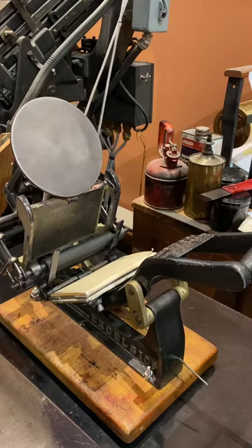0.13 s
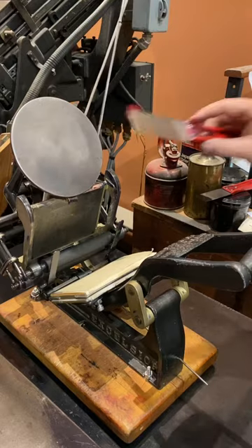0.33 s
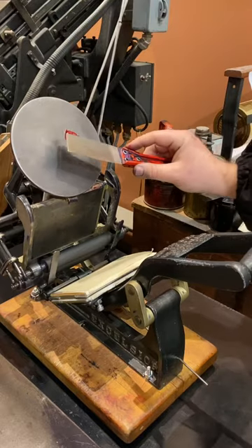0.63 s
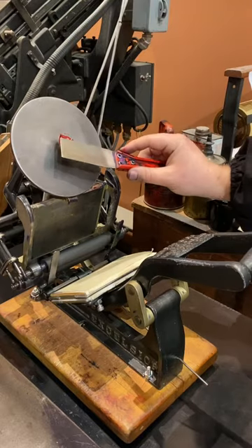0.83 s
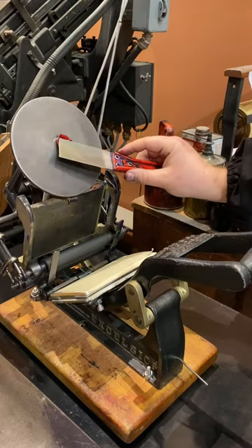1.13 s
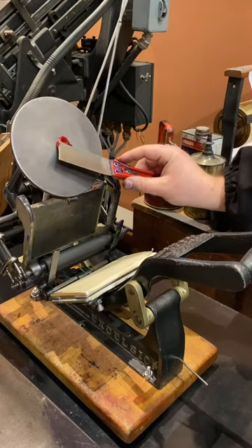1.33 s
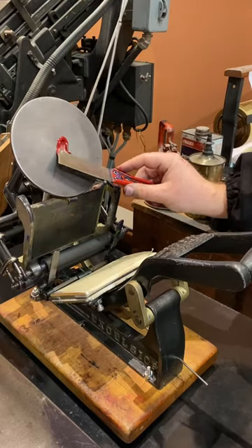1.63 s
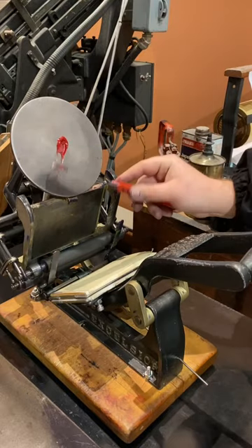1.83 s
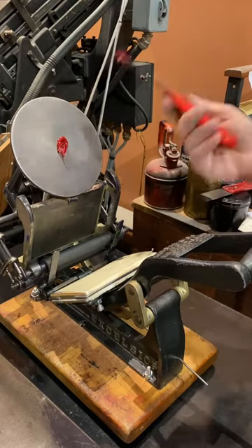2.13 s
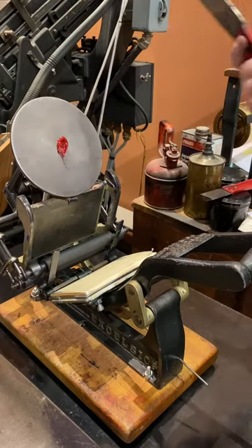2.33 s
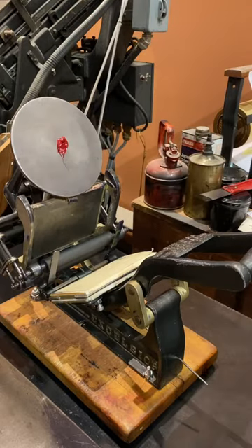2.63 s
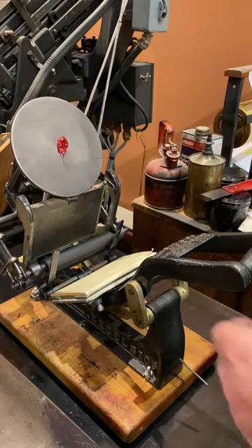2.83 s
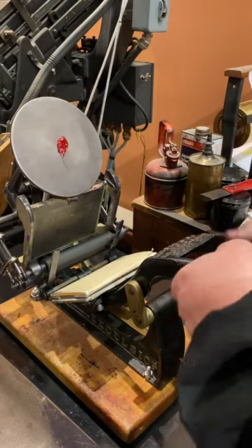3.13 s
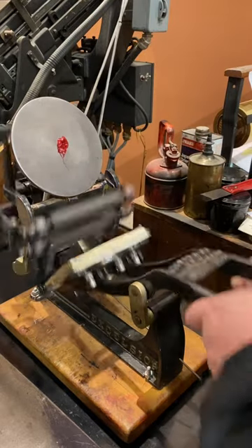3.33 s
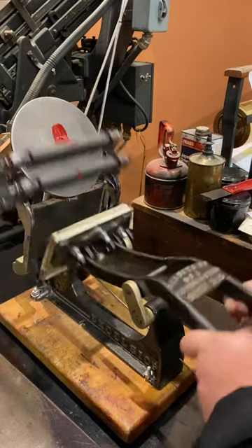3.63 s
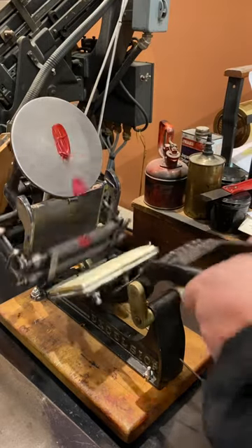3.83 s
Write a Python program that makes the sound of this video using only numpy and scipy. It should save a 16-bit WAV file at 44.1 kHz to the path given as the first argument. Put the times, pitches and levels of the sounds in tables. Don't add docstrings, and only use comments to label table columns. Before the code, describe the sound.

Cast-iron printing press at arm's length: quiet room air, soft knife touches and sleeve rustle first, then a sudden burst of roller grinding, metal clacks, brief disc ringing and heavy double slams in a small room.

```python
import sys
import numpy as np
from scipy import signal
from scipy.fft import rfft, irfft
from scipy.io import wavfile
from scipy.ndimage import uniform_filter1d

SR = 44100
rng = np.random.default_rng(int(sys.argv[2]) if len(sys.argv) > 2 else 0)


def persist_wave(psi):
    counts = np.round(np.clip(psi, -1, 1) * 32767).astype(np.int16)
    wavfile.write(sys.argv[1], SR, np.atleast_2d(counts).T)


def rack_gain(trim_db):
    fader = np.asarray(trim_db, float)
    return 10 ** (fader / 20)


N = 176400

# f/Hz, level/dB [per Hz]
AIR_SPECTRUM = [(35, -32), (60, -7.5), (140, -2.5), (312, -9), (760, -14.5), (1800, -23), (3400, -34),
                (15500, -42)]
# start t/s, air level/dB, offset jump level/dB
TAKES = [
    (0.041, 2, -25.5),
    (.992, 3.5, -25),
    (2.079, 1.3, -24),
    (2.573, 1.6, -23),
]
# t/s, half width/s
DIPS = [
    (2.081, 0.0065),
    (2.571, 0.0082),
]
# t/s, level/dB
HAND_LEVEL = [(.05, -41), (.5, -47), (.55, -37), (.97, -50), (1.02, -36), (1.3, -29.5), (1.6, -31.5),
              (2.06, -30), (2.12, -41), (2.5, -43), (3.08, -45.5), (3.13, -29), (3.5, -27.5), (3.69, -26),
              (3.77, -39.5), (3.9, -33.5), (4, -18)]
# t/s, rub level/dB, hiss level/dB
SLEEVE = [
    (2.57, -46, -60),
    (2.585, -50, -63.5),
    (2.72, -49, -60.5),
    (2.83, -45.5, -68),
    (2.95, -50, -66),
    (3.05, -54.5, -80),
    (3.2, -45, -70.5),
    (3.3, -38.5, -80),
]
# f/Hz, level/dB [per Hz]
CLOTH_SPECTRUM = [(150, -15), (300, -4), (734, -4.5), (1930, -9.5), (2400, -15), (5000, -27.5),
                  (15000, -38)]
# f/Hz, level/dB [per Hz]
HISS_SPECTRUM = [(3000, -36), (5500, -7), (8000, -4), (10500, -10.5), (15000, -20)]
# t/s, level/dB
BENCH_LEVEL = [(3.1, -43.5), (3.405, -40), (3.42, -21), (3.52, -20.5), (3.55, -35.5), (3.66, -52),
               (3.72, -36.5), (3.9, -45.5), (3.915, -28), (4, -23)]
# f/Hz, level/dB, width/Hz
BENCH_MODES = [(91.2, 2.5, 37.6), (109.2, -14, 22), (244.6, -10, 81), (407, -10, 75)]
# t/s, level/dB, f/Hz, decay time T60/s
KNIFE_TAPS = [
    (.54, -44, 895, 0.13),
    (0.546, -57, 2700, 0.065),
    (.565, -50, 1436, 0.057),
    (1.715, -35.5, 398, 0.08),
    (1.988, -43, 2700, 0.017),
    (1.989, -56, 4370, 0.017),
    (0.544, -42, 450, 0.13),
]
# t/s, length/s, level/dB, f/Hz
SQUEAKS = [
    (0.14, .11, -61, 1960),
    (0.27, .12, -63, 1700),
    (.7, .14, -64, 2963),
    (0.092, .45, -61, 750),
    (2.72, .2, -57, 1950),
    (1.04, .14, -62, 1730),
]
# t/s, level/dB, brightness/dB [per octave]
ROLL = [(3.1, -93, -19), (3.26, -37.5, -31), (3.32, -28, -2), (3.355, -15.5, -0.5), (3.42, -15, 0.5),
        (3.48, -17.5, -5), (3.55, -31, -23), (3.63, -41.5, -1), (3.72, -44.5, 1), (3.76, -27, -9.5),
        (3.85, -19, -3), (3.895, -26, -1), (3.92, -33, -11), (4, -19, -14)]
# f/Hz, level/dB, width/Hz
FRAME_MODES = [(613, -13, 230), (966, -5.5, 164), (1162, -0.5, 150), (1578, -1.5, 380), (2070, -1, 760),
               (2860, -3.5, 155), (3470, -5, 1560), (4400, -5, 670), (5440, -14, 67), (6940, -16, 74),
               (7650, -16.5, 170), (8530, -23.5, 150), (10200, -26.5, 680)]
# t/s, level/dB, centre/octaves [above 1 kHz], burst time/s [to fall 120 dB]
CLACKS = [(3.195, -43, 4.3, 0.035), (3.208, -37, 1.2, 0.035), (3.239, -40, 3.7, 0.045),
          (3.273, -24, 0.17, 0.072), (3.295, -37, 0.8, 0.033), (3.327, -15, 0.87, 0.035),
          (3.341, -10, 0.85, .03), (3.346, -10, 0.63, 0.023), (3.357, -5, 0.71, 0.069),
          (3.366, -10, 0.8, .03), (3.375, -4.5, 0.84, 0.05), (3.407, -11, 1.6, 0.059),
          (3.438, -17, .3, .03), (3.463, -6.5, 0.13, 0.039), (3.649, -23, 0.28, 0.04),
          (3.726, -22.5, 0.98, 0.04), (3.958, -11, 1.45, 0.033), (3.978, -24, 0.66, 0.022)]
# t/s, level/dB, centre/octaves [above 1 kHz], burst time/s [to fall 120 dB]
SLAMS = [(3.245, -11.5, 0.06, 0.056), (3.463, -11.5, -1.5, 0.11), (3.484, -8, 3, 0.054),
         (3.515, -11.5, .5, 0.06), (3.730, -3.5, 2, 0.15), (3.733, -6, 2.5, 0.068), (3.745, -1, 1.5, 0.051),
         (3.778, -14, 2.5, 0.12), (3.79, -1.5, 2, 0.044), (3.906, -5, 3, 0.092), (3.910, -4, 1, 0.054),
         (3.953, -9.5, 0.5, 0.055), (3.989, -4, 0.4, 0.044)]
# t/s, level/dB, centre/octaves [above 1 kHz], burst time/s [to fall 120 dB]
TICKS = [(3.284, -37, 3.3, .02), (3.426, -20, 3.5, 0.039), (3.430, -13.5, 3.15, .045),
         (3.437, -14, 3.5, .04), (3.464, -17, 3.2, .045), (3.471, -26, 4.2, 0.019), (3.515, -13, 3, .02),
         (3.525, -27, 3.2, .03), (3.549, -26, 2.9, .05), (3.601, -33, 3, .03), (3.616, -33, 3.75, 0.026),
         (3.626, -28, 3.2, .03), (3.649, -31.5, 3.5, .03), (3.667, -21, 3.42, 0.038),
         (3.690, -44, 3.4, .04), (3.709, -22, 3.4, .06), (3.957, -24, 3.2, .06), (3.974, -26, 2.3, .06)]
# t/s, level/dB, f/Hz, decay time T60/s
PINGS = [(3.246, -41, 4930, 0.041), (3.408, -33, 7850, 0.046), (3.409, -39, 6900, .05),
         (3.517, -16, 2860, 0.049), (3.515, -15.5, 1110, 0.046), (3.676, -29.5, 2186, 0.065),
         (3.698, -22.5, 1390, .035), (3.731, -9, 2925, 0.052), (3.732, -10, 5430, 0.049),
         (3.731, -5.5, 3700, 0.026), (3.729, -21, 4670, 0.044), (3.731, -8.5, 1180, 0.029),
         (3.745, -8, 1090, 0.045), (3.745, -15, 2960, 0.037), (3.745, -17, 13800, .04),
         (3.751, -30, 11640, 0.065), (3.777, -18, 3280, 0.072), (3.791, -11.5, 4620, 0.036),
         (3.789, -18.5, 7650, 0.043), (3.79, -16, 1126, 0.048), (3.789, -26, 7080, 0.037),
         (3.906, -7, 1274, 0.029), (3.907, -24, 4900, 0.035), (3.989, -12, 1140, 0.024),
         (3.429, -15, 93, 0.12), (3.514, -16.5, 238, 0.055), (3.649, -27.5, 126, 0.091),
         (3.912, -19.5, 73, 0.32)]
# t/s, level/dB
CHATTER_LEVEL = [(3.28, -79), (3.34, -55), (3.38, -48), (3.45, -43), (3.5, -38), (3.56, -48), (3.7, -50.5),
                 (3.75, -36), (3.85, -37.5), (3.9, -51), (3.92, -31), (4, -51)]
# f/Hz, level/dB [per Hz]
CHATTER_SPECTRUM = [(4000, -30), (7000, 3.5), (10000, 1), (13000, 0), (14500, -17), (15500, -27)]
PIN_HZ = [4950, 6955, 7650, 8650, 10100, 11900, 13100, 14300]
DISC_HZ = [2106, 3596, 3650, 5520, 5970, 6228, 6480, 7695, 8495, 10200, 11550, 13050]
# rim-struck level/dB, flat-struck level/dB, decay time T60/s
DISC_MODES = [(-23, -12, 0.72), (-7, -26, 0.37), (-10, -12, 0.58), (-17.5, -20, 0.13), (-41, -8, 0.15),
              (-49, -5.5, 0.08), (-20, -4.5, 0.11), (-25, -19.5, 0.39), (-25, -8, 0.096),
              (-14.5, -15.5, 0.081), (-25, -12.5, 0.12), (-30, -17, 0.042)]
# t/s, level/dB, flatness [0 rim - 1 flat], free ringing/s
STRIKES = [
    (3.485, -6.5, 0.05, 0.013),
    (3.517, -17, 0.12, 0.059),
    (3.906, -8, 0.99, 0.066),
    (3.957, -16.5, 0.7, 0.02),
    (3.982, -19.5, 0.95, .05),
]


def evened(x):
    return x / np.sqrt(np.mean(x ** 2) + 1e-20)


def curve(rows, col=1):
    rows = np.asarray(rows)
    return np.interp(np.arange(N) / SR, rows[:, 0], rows[:, col], left=-120)


def shaped(points):
    f, db = np.transpose(points)
    hz = np.fft.rfftfreq(N, 1 / SR)
    weight = rack_gain(np.interp(np.log(hz + 1), np.log(f), db)) * (hz > 40)
    return evened(irfft(rfft(rng.standard_normal(N)) * weight, N))


def add(mix, s, sound):
    part = mix[round(s * SR):][:len(sound)]
    part += sound[:len(part)]


def band(x, hz, width):
    r = np.exp(-np.pi * width / SR)
    return signal.lfilter([1 - r * r, 0, r * r - 1], [2, -4 * r * np.cos(2 * np.pi * hz / SR), 2 * r * r], x)


def steep(x, hz, width):
    return band(band(x, hz, 2 * width), hz, 2 * width)


def air():
    take_db = np.zeros(N)
    for s, db, _ in TAKES:
        take_db[round(s * SR):] = db
    drift_db = 1.0 * evened(uniform_filter1d(uniform_filter1d(rng.standard_normal(N), 2500), 2500))
    grain_db = 1.5 * evened(uniform_filter1d(rng.standard_normal(N), 200))
    lamp = rack_gain(-76) * evened(steep(rng.standard_normal(N), 3000, 90))
    room = shaped(AIR_SPECTRUM) * rack_gain(-49.5 + take_db + drift_db)
    rub = shaped(CLOTH_SPECTRUM) * rack_gain(curve(SLEEVE))
    hiss = shaped(HISS_SPECTRUM) * rack_gain(curve(SLEEVE, col=2))
    return lamp + room + rack_gain(grain_db) * (rub + hiss)


def rumble():
    hand_force, bench_force = rng.standard_normal((2, N))
    hand_hz, hand_width_hz = 25, 30
    sway = band(band(hand_force, hand_hz, hand_width_hz), hand_hz, hand_width_hz)
    hand = evened(sway) + rack_gain(-17) * evened(steep(hand_force, 71.6, 40))
    table = np.zeros(N)
    for hz, db, width in BENCH_MODES:
        table += rack_gain(db) * evened(band(band(bench_force, hz, width), hz, width))
    return hand * rack_gain(curve(HAND_LEVEL)) + evened(table) * rack_gain(curve(BENCH_LEVEL))


def knife():
    out, t = np.zeros(N), np.arange(6000) / SR
    for s, db, hz, t60 in KNIFE_TAPS:
        tap = evened(steep(rng.standard_normal(6000), hz, 0.14 * hz))
        add(out, s, rack_gain(db - 60 * t / t60) * tap)
    for s, length, db, hz in SQUEAKS:
        n = round(length * SR)
        squeak = evened(band(rng.standard_normal(N // 4), hz, 35))[-n:]
        add(out, s, rack_gain(db) * np.hanning(n) * squeak)
    return out


def rollers():
    slips_per_s, slip_spread_db, slip_s = 3600, 2.2, 0.0015
    slips = (rng.random(N) < slips_per_s / SR) * rack_gain(slip_spread_db * np.minimum(rng.exponential(1, N), 4))
    scratch_level = signal.lfilter([1], [1, -np.exp(-1 / (slip_s * SR))], slips)
    scratches = scratch_level * rng.standard_normal((2, N))
    frame_force, wash_force = signal.lfilter(*signal.butter(2, 9000, fs=SR), scratches)
    tilt = np.maximum(curve(ROLL, col=2), -10)
    rings, wash = np.zeros(N), np.zeros(N)
    for hz, db, width in FRAME_MODES:
        flutter_db = 4.23 * evened(band(rng.standard_normal(N), 19, 25)) - 4
        mode = evened(steep(frame_force, hz, width / 2))
        rings += rack_gain(db + tilt * np.log2(hz / 1500)) * mode * rack_gain(flutter_db)
    for hz in (1100, 1900, 3100, 5000, 8000, 12500):
        wash_db = tilt * np.log2(hz / 1500) - 7.4 * np.log2(hz / 2000) ** 2
        wash += rack_gain(wash_db) * evened(steep(wash_force, hz, 0.13 * hz))
    return rack_gain(curve(ROLL)) * (rings + rack_gain(-3) * wash) / 2


def clacks(rows, fall_db, crack_db):
    out, t = np.zeros(N), np.arange(4000) / SR
    hz = np.fft.rfftfreq(4000, 1 / SR) + 1
    for s, db, centre, t60 in rows:
        burst = rng.standard_normal(4000) * rack_gain(-120 * t / t60)
        luck_db = 4 * rng.standard_normal(len(FRAME_MODES))
        colour = rack_gain(-fall_db * (np.log2(hz / 1000) - centre) ** 2)
        burst = irfft(rfft(np.roll(burst, shift=SR // 500)) * colour)
        ring = np.zeros(4000)
        for mode_luck_db, (f, mode_db, width) in zip(luck_db, FRAME_MODES):
            ring += rack_gain(mode_db + mode_luck_db) * band(burst, f, width + 60) / np.sqrt(width)
        blow = ring / abs(ring).max() + rack_gain(crack_db) * burst / abs(burst).max()
        add(out, s - 1 / 500, rack_gain(db) * blow / abs(blow).max())
    return out


def pings():
    out, t = np.zeros(N), np.arange(4000) / SR
    for s, db, hz, t60 in PINGS:
        rough = 0.5 * evened(band(rng.standard_normal(4000), hz, min(250, hz / 2)))
        envelope = rack_gain(db - 60 * t / t60) * np.minimum(t / 0.00064, 1)
        add(out, s, envelope * (np.sin(2 * np.pi * hz * t) + rough))
    grain_db = 2.5 * evened(uniform_filter1d(rng.standard_normal(N), 90))
    chatter = shaped(CHATTER_SPECTRUM)
    sung = np.zeros(N)
    for hz in PIN_HZ:
        flutter_db = 4 * evened(band(rng.standard_normal(N), 14, 31))
        sung += steep(chatter, hz, 70) * rack_gain(flutter_db)
    return out + (0.8 * chatter + 0.6 * evened(sung)) * rack_gain(curve(CHATTER_LEVEL) + grain_db)


def disc():
    out, t = np.zeros(N), np.arange(SR // 2) / SR
    for s, db, flat, free_s in STRIKES:
        damping_db = 497 * np.clip(t - free_s, 0, 0.03)
        for hz, (rim_db, flat_db, t60) in zip(DISC_HZ, DISC_MODES):
            mode_db = rim_db + flat * (flat_db - rim_db)
            waver_db = 2.9 * evened(uniform_filter1d(rng.standard_normal(len(t)), 350))
            envelope = rack_gain(db + mode_db - damping_db + waver_db - 60 * t / t60) * np.minimum(t / 0.0021, 1)
            add(out, s, envelope * np.sin(2 * np.pi * (hz * t + rng.random())))
    return out


def shop(x):
    t, t60 = np.arange(SR // 2) / SR, 0.47
    signs = rng.choice([-1., 1.], len(t))
    taps = signs * (rng.random(len(t)) < 0.05) * rack_gain(-60 * t / t60) * (t > 0.004)
    taps = signal.lfilter(*signal.butter(1, 5540, fs=SR), taps)
    return signal.fftconvolve(x, taps / np.linalg.norm(taps))[:N]


def scene():
    knocks = clacks(CLACKS, fall_db=15.5, crack_db=-4.5)
    slams = clacks(SLAMS, fall_db=2.5, crack_db=-4.5)
    ticks = clacks(TICKS, fall_db=18, crack_db=17)
    press = rollers() + knocks + slams + ticks + pings() + disc() + knife()
    return (press + rack_gain(-15.5) * shop(press) + air() + rumble())[None]


def band_limit(x):
    return signal.sosfilt(signal.butter(12, 15760, fs=SR, output="sos"), x)


def record(dry):
    t = np.arange(N) / SR
    gain = np.clip((t - TAKES[0][0]) / 0.005, 0, 1)
    for s, half in DIPS:
        gain = gain * np.minimum(abs(t - s) / half, 1)
    jumps, u = np.zeros(N), t[:3000]
    for k, (s, _, db) in enumerate(TAKES):
        rise_s = 1e-5 if k == 1 else 0.015
        settling = np.cos(2 * np.pi * 17 * u) * np.exp(-u / 0.041)
        add(jumps, s, rack_gain(db) * settling * np.minimum(u / rise_s, 1))
    clipped = np.clip(dry * gain + jumps, -1, 1)
    mix = signal.oaconvolve(clipped, signal.firwin(255, 15500, fs=SR)[None], "same")
    return band_limit(mix)


dry = scene()
out = record(dry)
persist_wave(out)
```